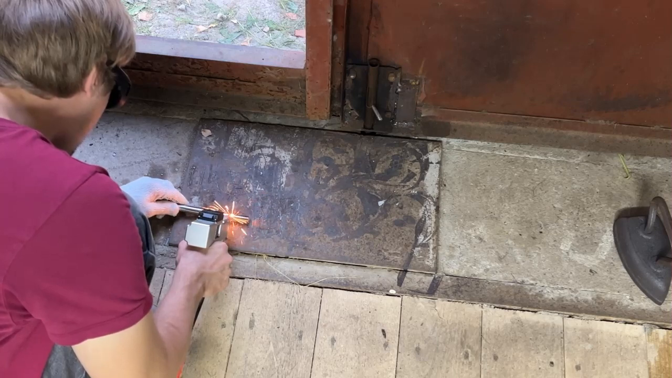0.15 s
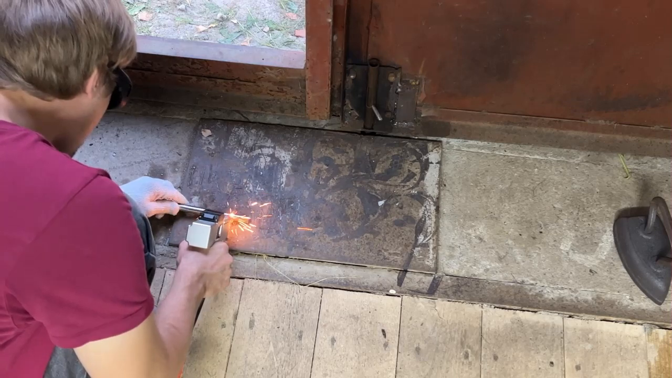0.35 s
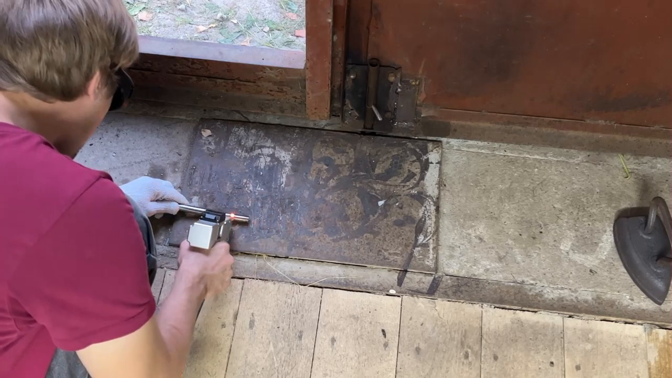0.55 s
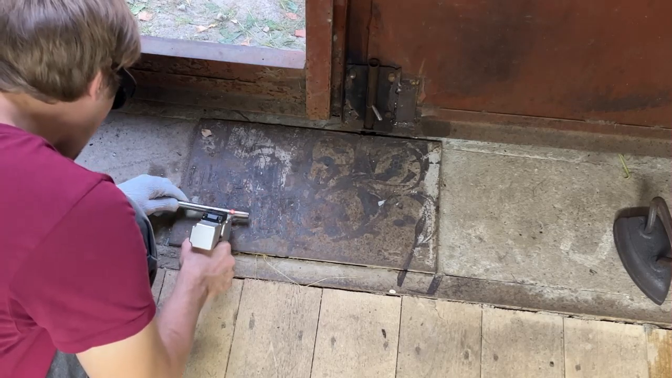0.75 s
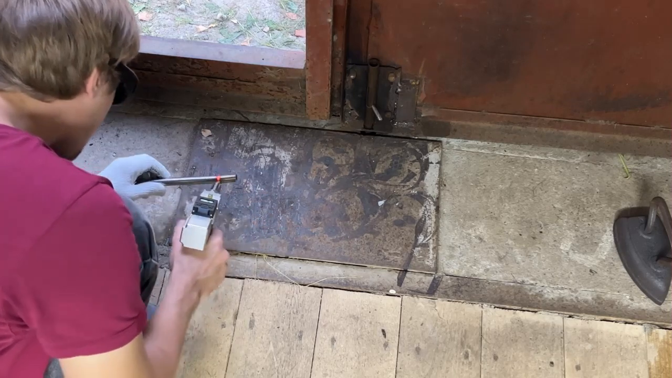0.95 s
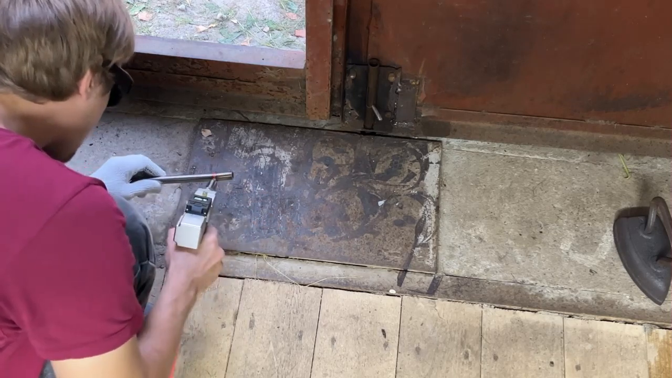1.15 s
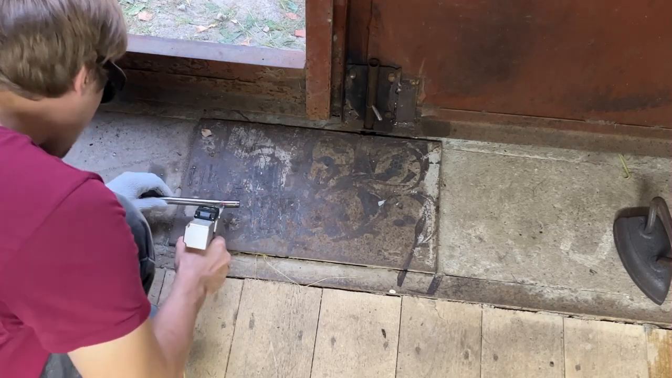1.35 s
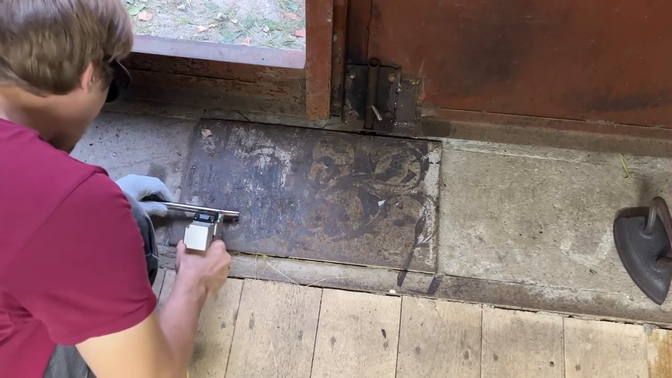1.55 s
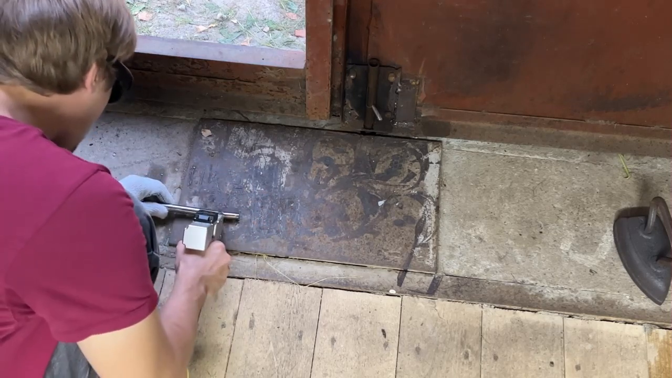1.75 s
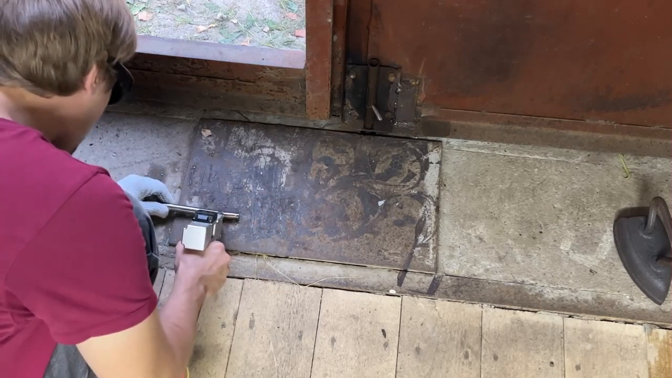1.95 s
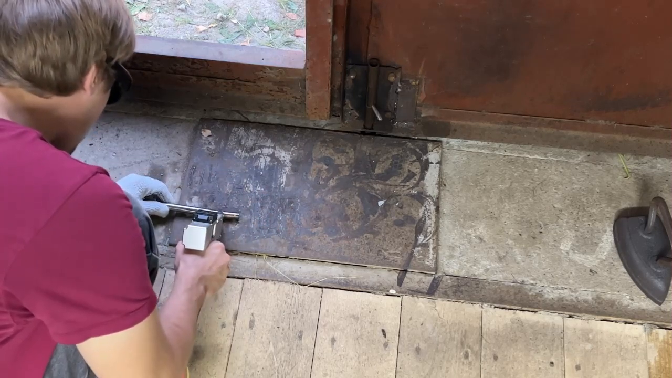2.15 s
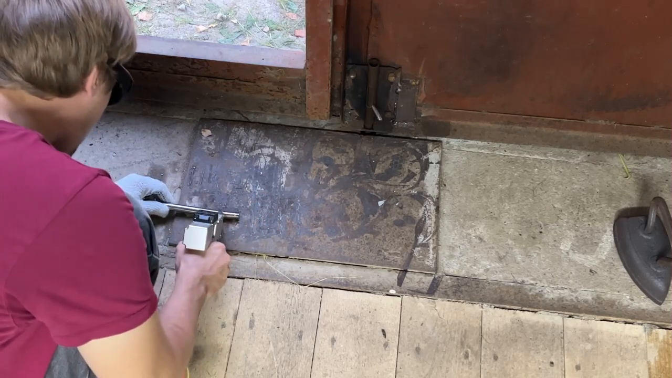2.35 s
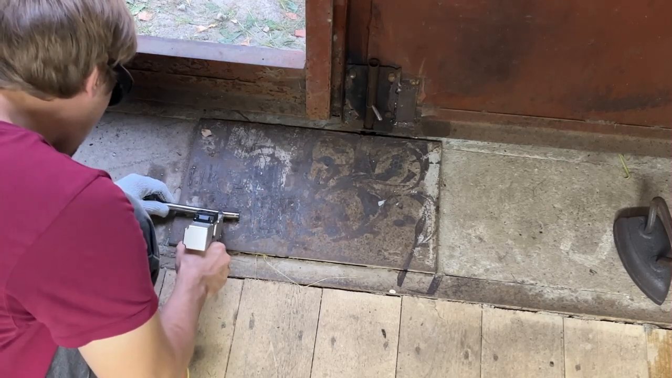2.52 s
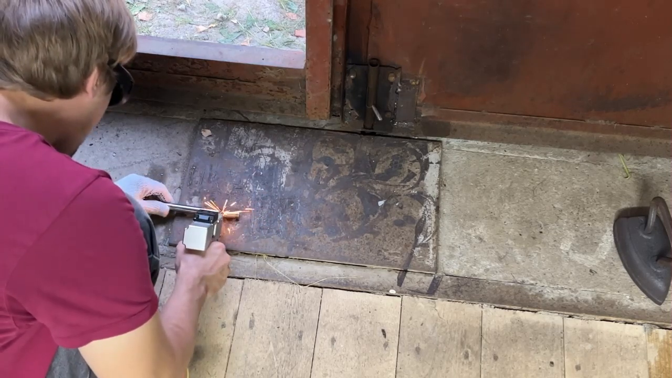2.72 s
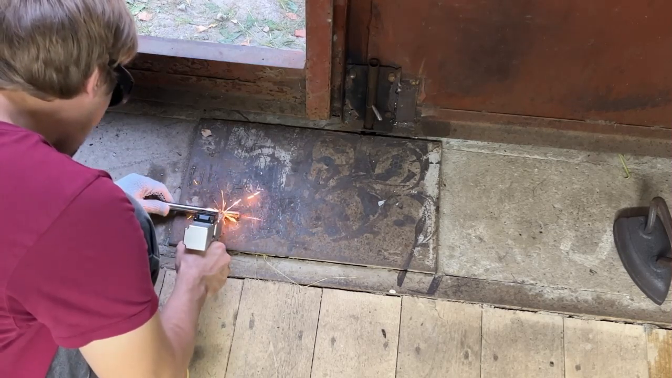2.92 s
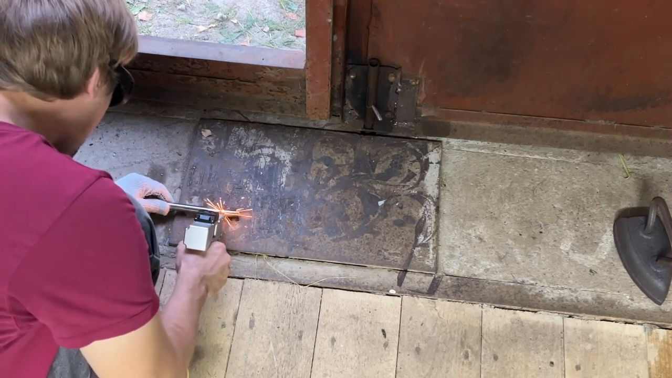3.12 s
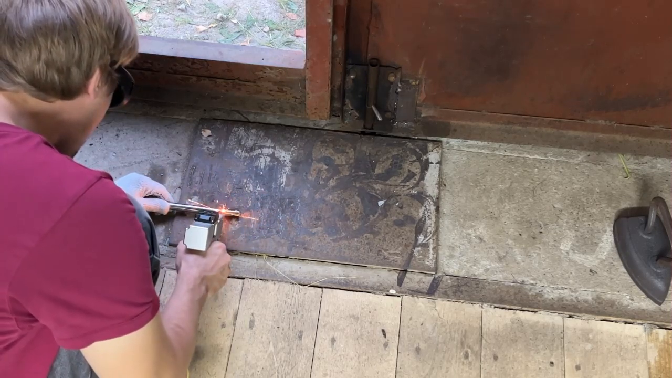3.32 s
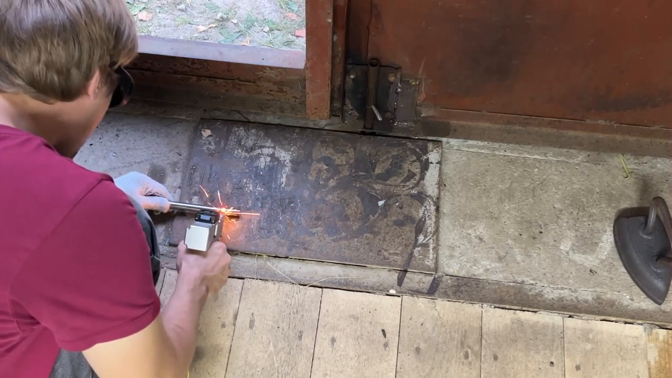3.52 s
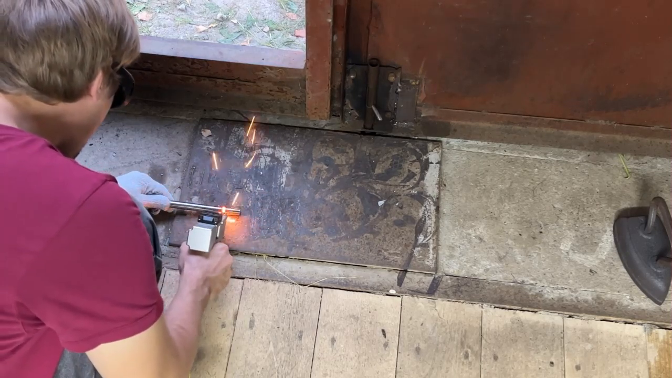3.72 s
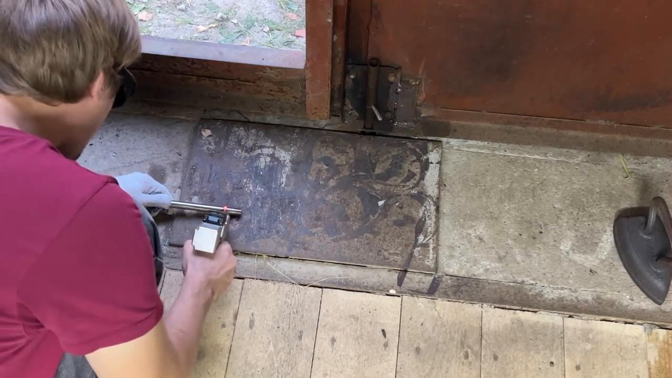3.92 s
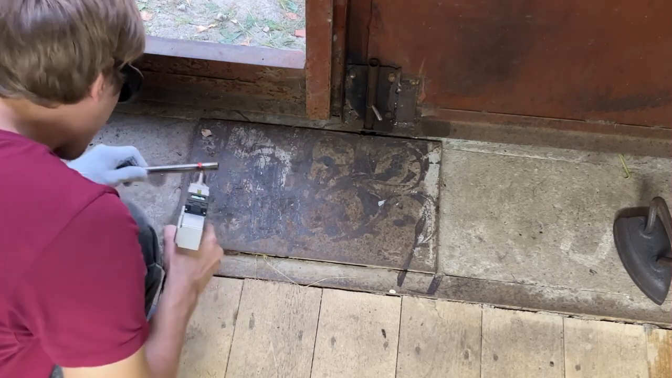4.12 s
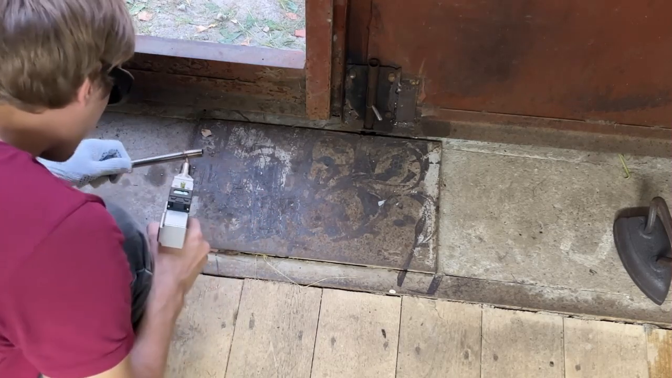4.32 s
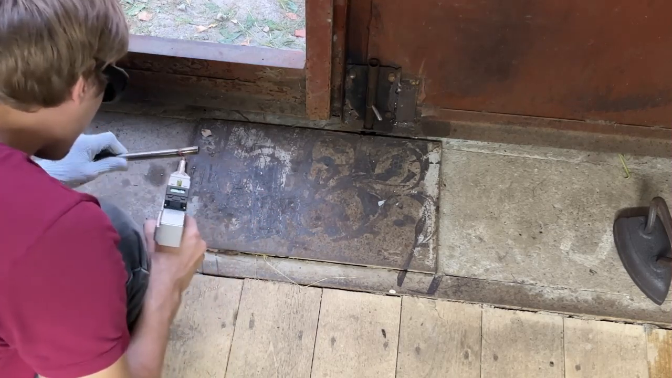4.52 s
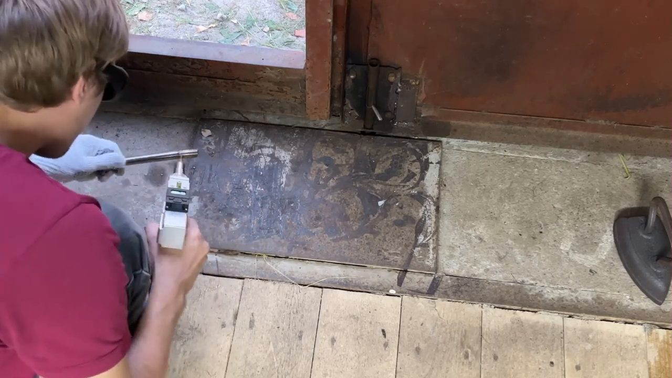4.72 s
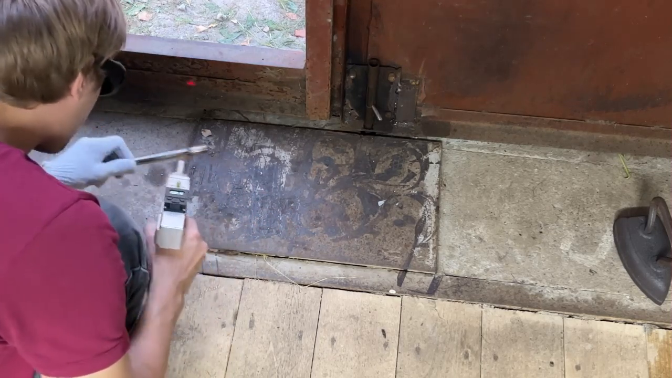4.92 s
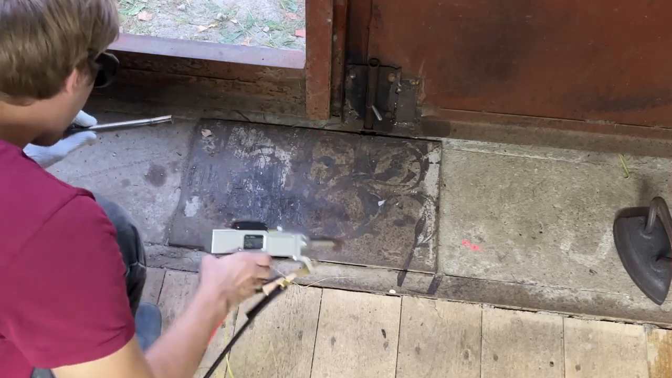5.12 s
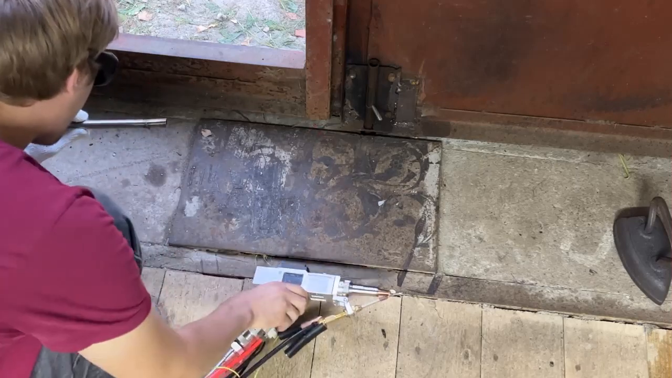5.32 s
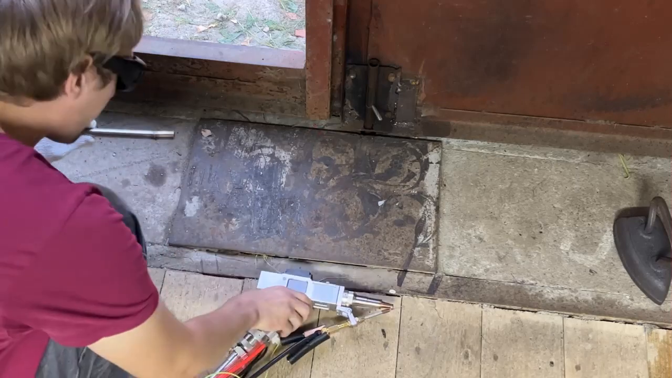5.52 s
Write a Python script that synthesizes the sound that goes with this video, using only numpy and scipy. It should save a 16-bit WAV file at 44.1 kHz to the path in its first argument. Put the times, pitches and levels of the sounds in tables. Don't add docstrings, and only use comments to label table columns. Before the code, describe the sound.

Bright, crackly welding sizzle stops and restarts over hissing gas and a chiller's drone, ending with a small puff and dull wooden thumps.

```python
import sys
import numpy as np
from scipy import signal
from scipy.fft import rfft, irfft, next_fast_len
from scipy.io import wavfile
from scipy.ndimage import uniform_filter1d

SR = 44100
rng = np.random.default_rng(int(sys.argv[2]) if len(sys.argv) > 2 else 0)


def nominal_scale(level):
    x = np.asarray(level, float) / 20
    return 10 ** x


def transcribe(u):
    v = np.clip(np.atleast_2d(u).T, -1, 1)
    q = np.round(v * 32767).astype(np.int16)
    wavfile.write(sys.argv[1], SR, q)


N = 245195
T = np.arange(N) / SR

# beam_on_s, beam_off_s, sizzle_db
WELDS = [
    (-1, .49, -20.6),
    (2.586, 3.868, -22.5),
]
STRIKE_DB_PER_S, QUENCH_DB_PER_S = 900, 700
SEEP_DB = -66.5
# centre_s, change_db, half_length_s
WIRE_FALTERS = [
    (2.72, -2.5, .05),
    (3.1, -1.5, .07),
    (3.23, 2, .07),
    (3.38, -2.5, .05),
    (3.62, 1.5, .06),
    (3.705, -9, .025),
    (3.77, -4, .04),
]
# freq_hz, density_db_per_hz
SIZZLE_COLOUR = [(700, -37), (1500, -27.5), (3000, -21.5), (4300, -28), (5500, -15.5), (7500, -14.5),
                 (9500, -6), (11700, -3.5), (14500, 3), (15500, -9)]

# valve_opens_s, valve_shuts_s, flow_noise_db
TRIGGER_PULLS = [
    (-1, .8, -35),
    (2.015, 2.15, -33.5),
    (2.33, 4.19, -35.5),
]
FILL_S, SURGE_DB, SURGE_S = .07, 5, .35
BLEED_DB_PER_S, BLEED_DB_PER_S2 = 70, 300
# freq_hz, width_hz, level_db
NOZZLE_MODES = [(3345, 100, -8.5), (3850, 83, -21), (4840, 340, -1), (4853, 60, -.5), (5550, 73, -15),
                (5936, 44, 0), (5970, 290, -8), (6940, 650, -2), (8920, 220, -7), (9940, 540, -5.5),
                (11530, 410, 4), (12800, 300, -9), (13600, 580, 1.5), (13870, 45, 1.5), (14700, 920, -4)]
# freq_hz, density_db_per_hz
GAS_COLOUR = [(700, -45), (1500, -4), (3000, -6), (6000, -3), (8200, -33), (11000, -23), (14000, -3.5),
              (15500, 5)]

# freq_hz, density_db_per_hz
DRONE_COLOUR = [(25, -6), (50, -9.5), (80, -11), (130, -5), (250, -3.5), (450, -4.5), (820, -4.5),
                (1000, -10.5), (2000, -16.5), (3500, -27), (4600, -26), (6500, -31), (11000, -35.5),
                (15500, -72)]
# freq_hz, width_hz, level_db
CHILLER_MODES = [(49, 13, -12.5), (145, 23, -4), (178.4, 31.4, -5), (524.5, 60, -15), (758, 66, -8.5),
                 (12640, 300, -19)]
DRONE_DB, CHILLER_DB, MOTOR_DB, MOTOR_HZ = -46.5, -49, -49, 176

RELAY_HZ, RELAY_DB, RELAY_HALF_S, AFTER_FLOW_S = 535, -47, .03, .39

# start_s, level_db, rise_s, t60_s, body_ring_db
PUFFS = [
    (1.996, -25, 0.022, 0.15, -24),
    (2.313, -25, 0.022, 0.16, -40),
    (4.797, -33.5, .01, 0.12, -7.5),
]
# freq_hz, density_db_per_hz
PUFF_COLOUR = [(700, -16), (1500, -15), (5000, -19.5), (7500, -4), (9000, -7), (11500, 3), (13000, -4),
               (14500, -12), (15700, -15)]

# start_s, level_db, pitch_hz, t60_s
THUMPS = [
    (4.879, -30.5, 148, 0.14),
    (5.271, -30, 174.6, 0.15),
    (5.404, -25.5, 171, 0.12),
    (5.491, -37, 163, 0.086),
]

# from_hz, right_lead_rad
POOL_IMAGE = [(0, .5), (1200, 1.0), (4350, 1.3), (5200, 2.7), (5700, 1.6), (7600, -.6), (8500, 2.4),
              (9400, .8), (10300, 2.2), (10950, .8), (12600, 1.7), (14700, 1.0)]
# from_hz, right_lead_rad
GAS_IMAGE = [(0, .5), (1200, 1.3), (3800, 2.2), (4250, .8), (6400, -2.4), (8400, .3), (9000, 2.5),
             (9500, .6), (10500, 2.0), (11800, .6)]
# from_hz, right_lead_rad
CHILLER_IMAGE = [(0, .5), (1000, 1.35), (4700, -1.6), (5600, 2.3), (6900, -1.0), (8700, -2.4), (10900, .05)]
# start_s, end_s, first_centre_hz, width_hz
OPPOSED = [(0, .5, 7450, 300), (0, .52, 4250, 600), (.3, 1.4, 9400, 450), (.5, 1.79, 7400, 900),
           (.55, .75, 10800, 500), (.75, 1.35, 11250, 1300), (1.35, 1.92, 9800, 2600),
           (2.08, 2.31, 7550, 1700), (2.39, 2.64, 7400, 1700), (2.64, 2.96, 6800, 1950),
           (3.2, 3.45, 6300, 450), (2.45, 2.7, 4050, 350), (2.7, 3.3, 4000, 750), (3.3, 3.8, 4050, 650),
           (3.8, 4.2, 4200, 200), (2.95, 3.45, 7400, 500), (2.97, 3.17, 5600, 600), (3.23, 4, 5550, 450),
           (3.45, 4.05, 7150, 850), (3.9, 4.35, 10750, 600), (4.05, 4.55, 6700, 500),
           (4.65, 5.25, 6550, 250), (4.38, 5.15, 10300, 600), (4.62, 4.95, 5450, 450),
           (5.15, 5.56, 9450, 1200), (5.25, 5.56, 6100, 900)]
SLIDE_PER_S = .08
RAGGED = np.repeat(rng.uniform(.8, 1.3, N // 2048 + 2), 8)[:N // 256 + 2]

# start_s, rise_db
GAIN_STEP = (4.73, 4.8)
CUTOFF_HZ = 15720


def rms_one(x):
    return x / np.sqrt(np.mean(x ** 2) + 1e-20)


def drift(rate_hz, count=N):
    r = np.exp(-2 * np.pi * rate_hz / SR)
    settled = signal.lfilter([1], [1, -2 * r, r * r], rng.standard_normal(count + SR))[SR:]
    return rms_one(settled)


def coloured(x, spectrum):
    size = next_fast_len(N)
    hz, db = np.transpose(spectrum)
    bin_hz = np.fft.rfftfreq(size, 1 / SR)
    gain = nominal_scale(np.interp(np.log(bin_hz + 1), np.log(hz), db))
    return rms_one(irfft(rfft(x, size) * gain, size)[:N])


def resonate(x, hz, width_hz):
    r = np.exp(-np.pi * width_hz / SR)
    zeros = [(1 - r * r) / 2, 0, (r * r - 1) / 2]
    poles = [1, -2 * r * np.cos(2 * np.pi * hz / SR), r * r]
    return signal.lfilter(zeros, poles, x)


def whistles(modes, flicker_db):
    out = np.zeros(N)
    for hz, width_hz, db in modes:
        narrow = resonate(rng.standard_normal(N), hz, width_hz)
        tone = resonate(narrow, hz, 3 * width_hz)
        out += rms_one(tone) * nominal_scale(db + flicker_db * drift(3.7))
    return rms_one(out)


def smooth(grid, bins, frames):
    return uniform_filter1d(uniform_filter1d(grid, size=bins, axis=0), size=frames, axis=1)


def sizzle_gain():
    wire_db = sum(db * np.exp(-((T - s) / half_s) ** 2) for s, db, half_s in WIRE_FALTERS)
    gain = nominal_scale(SEEP_DB)
    for on_s, off_s, db in WELDS:
        strike_db = STRIKE_DB_PER_S * np.maximum(on_s - T, 0)
        quench_db = QUENCH_DB_PER_S * np.maximum(T - off_s, 0)
        gain = gain + nominal_scale(db + wire_db - strike_db - quench_db)
    return gain


def melt_pool():
    jet = rng.standard_normal(N) * nominal_scale(0.71 * drift(480) + 0.39 * drift(17))
    strikes = rng.random(N) < 900 / SR
    crack_size = nominal_scale(7.1 * np.minimum(rng.exponential(1, N), 4))
    spatter = strikes * crack_size * rng.choice([-1, 1], N)
    sizzle = coloured(jet + nominal_scale(-18.5) * rms_one(spatter), SIZZLE_COLOUR)
    return sizzle_gain() * sizzle


def gas_flow_db():
    flow = 1e-4
    for opens_s, shuts_s, db in TRIGGER_PULLS:
        age = np.maximum(T - opens_s, 0)
        after = np.maximum(T - shuts_s, 0)
        fill = (1 - np.exp(-age / FILL_S)) ** 2
        surge_db = SURGE_DB * np.exp(-age / SURGE_S)
        bleed_db = BLEED_DB_PER_S * after + BLEED_DB_PER_S2 * after ** 2
        flow = flow + fill * nominal_scale(db + surge_db - bleed_db)
    return 20 * np.log10(flow)


def shielding_gas():
    flow_db = gas_flow_db()
    hiss = nominal_scale(-5) * coloured(rng.standard_normal(N), GAS_COLOUR)
    tube = whistles(NOZZLE_MODES, flicker_db=-0.5) + hiss
    bass = signal.sosfiltfilt(signal.butter(4, 6600, fs=SR, output="sos"), tube)
    dulling = nominal_scale(0.3 * np.minimum(flow_db + 30.5, 0))
    return nominal_scale(flow_db + 0.91 * drift(37)) * (bass + dulling * (tube - bass))


def chiller():
    drone = nominal_scale(DRONE_DB + .5 * drift(4.1)) * coloured(rng.standard_normal(N), DRONE_COLOUR)
    motor_hz = MOTOR_HZ + 5.02 * drift(5.89)
    motor = nominal_scale(MOTOR_DB + 3.0 * drift(2.5)) * np.sin(2 * np.pi * np.cumsum(motor_hz) / SR)
    return drone + nominal_scale(CHILLER_DB) * whistles(CHILLER_MODES, flicker_db=-2.2) + motor


def relay():
    shape = np.zeros(N)
    for _, off_s, _ in WELDS:
        for wait_s in (.02, AFTER_FLOW_S + .015):
            shape += np.exp(-((T - off_s - wait_s) / RELAY_HALF_S) ** 2)
    return nominal_scale(RELAY_DB) * shape * np.sin(2 * np.pi * RELAY_HZ * T)


def valve():
    air = coloured(rng.standard_normal(N), PUFF_COLOUR)
    body = rms_one(resonate(rng.standard_normal(N), 3650, 360))
    out = np.zeros(N)
    for start_s, db, rise_s, t60_s, ring_db in PUFFS:
        age = np.maximum(T - start_s, 0)
        decay = nominal_scale(-60 * np.maximum(age - rise_s, 0) / t60_s)
        shape = np.minimum(age / rise_s, 1) ** 2 * decay
        out += nominal_scale(db) * shape * (air + nominal_scale(ring_db) * body)
    return out


def boards():
    out = np.zeros(N)
    for start_s, db, hz, t60_s in THUMPS:
        age = np.maximum(T - start_s, 0)
        shape = np.minimum(age / 0.026, 1) * nominal_scale(-60 * age / t60_s)
        out += nominal_scale(db) * shape * np.sin(2 * np.pi * hz * age)
    return out


def doorway(x, wet_db, t60_s):
    age = T[:SR // 4]
    echoes = rng.standard_normal(len(age)) * nominal_scale(-60 * age / t60_s) * (age > .002)
    echoes = echoes / np.sqrt(np.sum(echoes ** 2))
    return x + nominal_scale(wet_db) * signal.fftconvolve(x, echoes)[:N]


def phase_image(mono, bands, wander_hz, patchy):
    hz, s, spectrum = signal.stft(mono, SR, nperseg=1024, noverlap=768)
    edges = np.array([edge + wander_hz * np.interp(s, T, drift(1.2)) * (edge > 0) for edge, _ in bands])
    band = (hz[:, None, None] > edges).sum(axis=1) - 1
    lead = np.array(bands)[np.clip(band, 0, None), 1]
    field = smooth(rng.standard_normal(lead.shape), bins=8, frames=36)
    lead = lead + np.round(patchy * rms_one(field)) * np.pi / 2.2 * (hz[:, None] > 1900)
    for start_s, end_s, first_hz, width_hz in OPPOSED:
        spell = slice(*np.searchsorted(s, [start_s, end_s]))
        centre_hz = first_hz * (1 - SLIDE_PER_S * (s[spell] - start_s))
        inside = np.abs(hz[:, None] - centre_hz) < width_hz * RAGGED[spell] / 2
        lead[:, spell][inside] = np.pi
    sides = spectrum * np.exp(.5j * lead * [[[-1]], [[1]]])
    return signal.istft(sides, SR, nperseg=1024, noverlap=768)[1][:, :N]


def scene():
    pool = doorway(melt_pool(), wet_db=-1.5, t60_s=0.037)
    nozzle = doorway(shielding_gas() + valve(), wet_db=-7, t60_s=0.037)
    machine = doorway(chiller() + relay(), wet_db=-11, t60_s=0.34) + boards()
    return (phase_image(pool, POOL_IMAGE, wander_hz=120, patchy=.6)
            + phase_image(nozzle, GAS_IMAGE, wander_hz=150, patchy=.5)
            + phase_image(machine, CHILLER_IMAGE, wander_hz=250, patchy=.3))


def band_gate(x, depth_db, chance_db):
    hz, s, spectrum = signal.stft(x, SR, nperseg=1024, noverlap=768)
    power = smooth(np.sum(np.abs(spectrum) ** 2, axis=0), bins=6, frames=8)
    under_db = 10 * np.log10(power / power[hz > 9000].mean(axis=0) + 1e-20)
    luck = smooth(rng.standard_normal(power.shape), bins=5, frames=7)
    row_hz = hz[:, None]
    strong = under_db + chance_db * rms_one(luck) > -depth_db + 4.0 * (row_hz > 7300)
    keep = strong | (row_hz < 1800) | (row_hz > 9500)
    return signal.istft(spectrum * keep, SR, nperseg=1024, noverlap=768)[1][:, :N]


def low_pass(x):
    return signal.sosfilt(signal.butter(12, 16770, fs=SR, output="sos"), x)


def record(dry):
    step_s, step_db = GAIN_STEP
    gain_db = step_db * np.clip((T - step_s) / 0.017, 0, 1)
    top_cut = signal.ellip(14, .5, 62, CUTOFF_HZ, fs=SR, output="sos")
    cut = signal.sosfilt(top_cut, dry * nominal_scale(gain_db))
    mix = band_gate(cut, depth_db=21.5, chance_db=5)
    return low_pass(mix)


dry = scene()
out = record(dry)
transcribe(out)
```